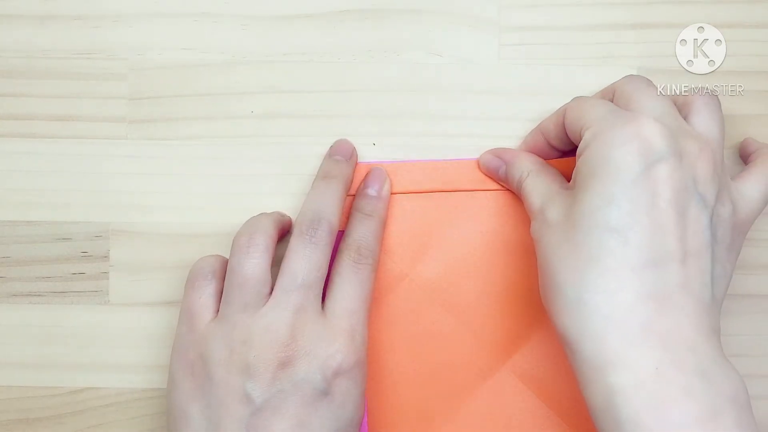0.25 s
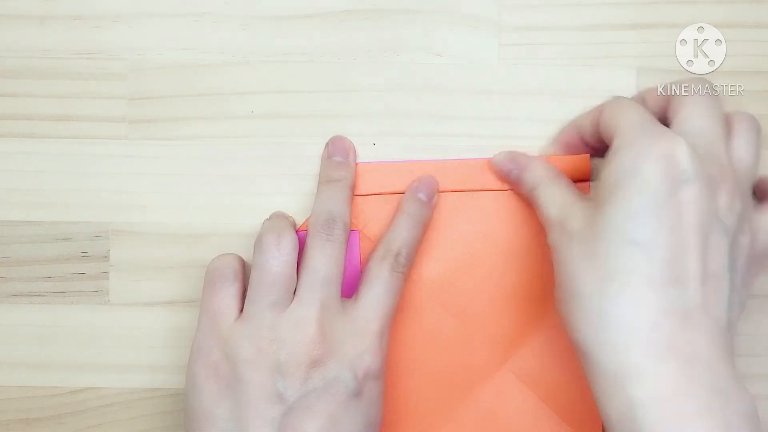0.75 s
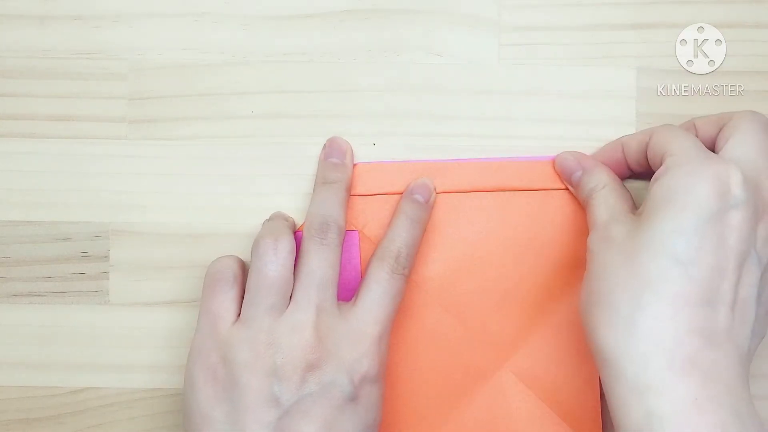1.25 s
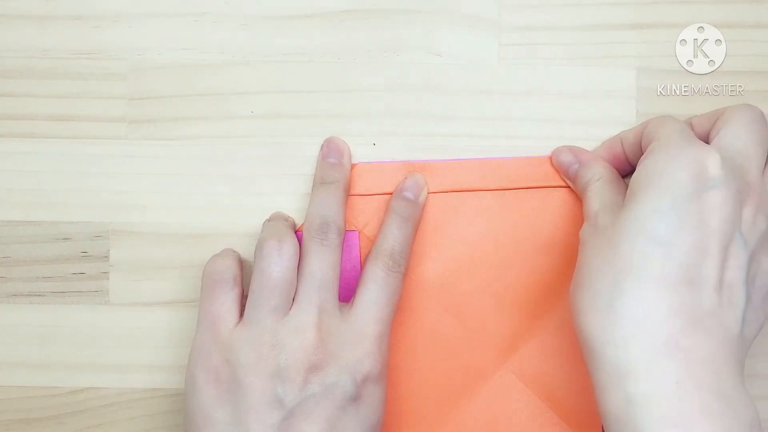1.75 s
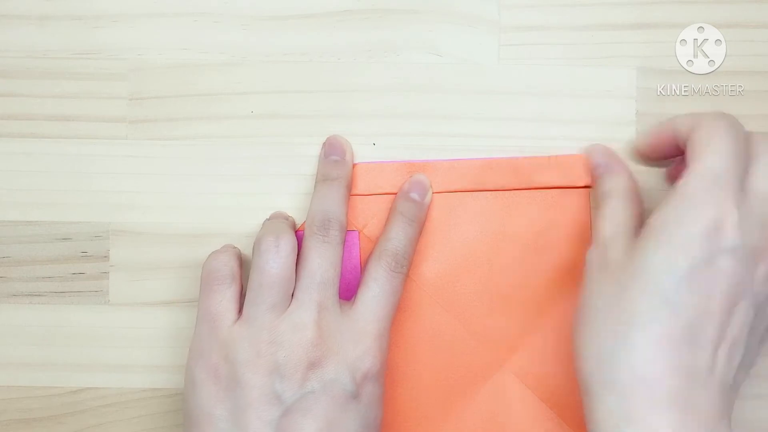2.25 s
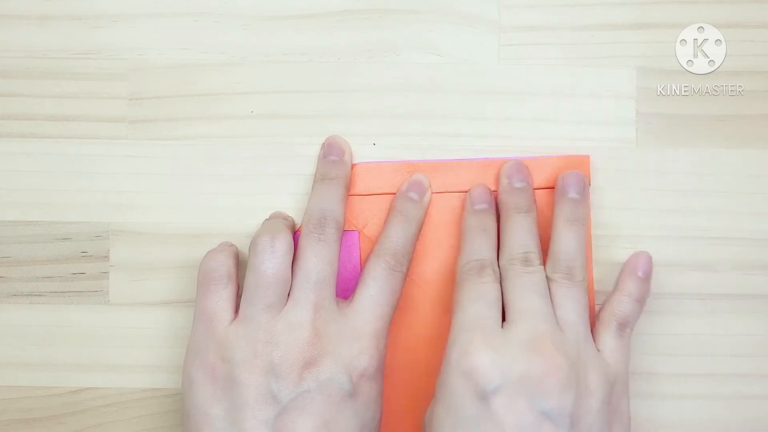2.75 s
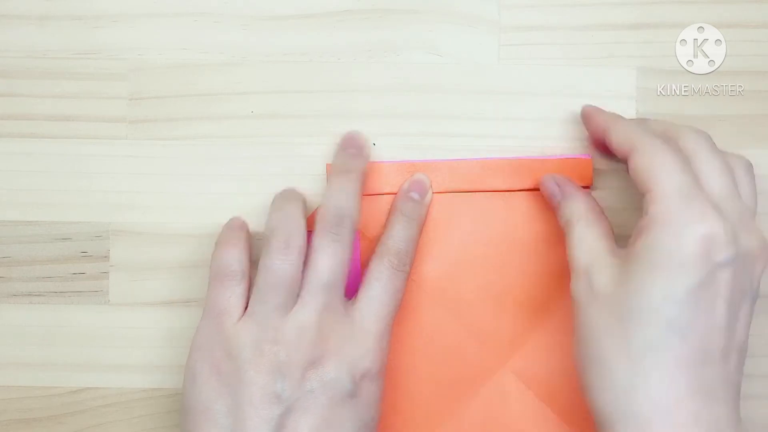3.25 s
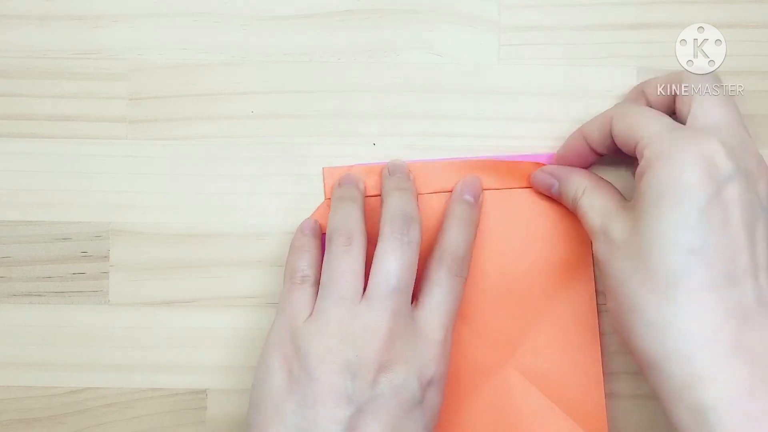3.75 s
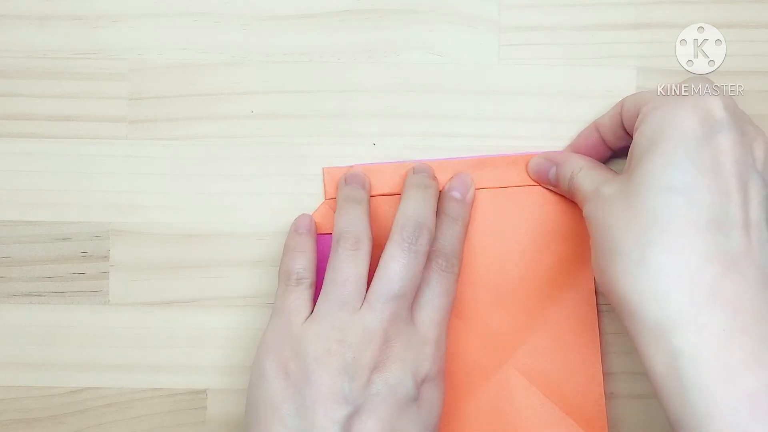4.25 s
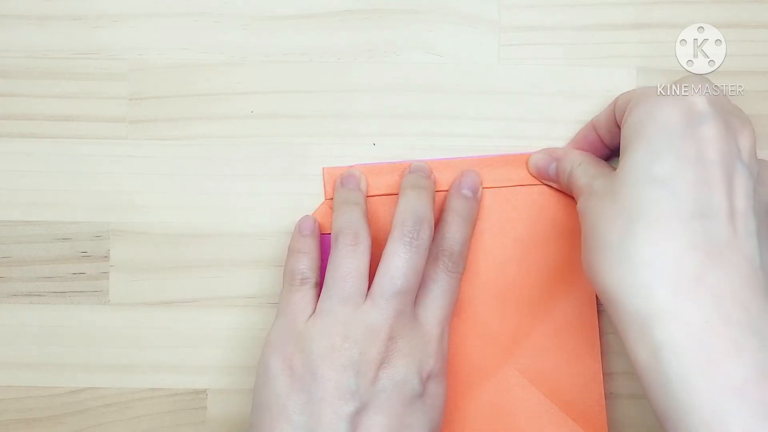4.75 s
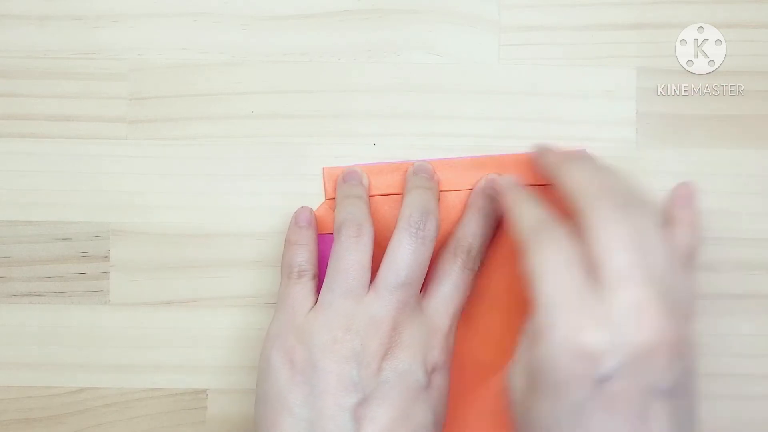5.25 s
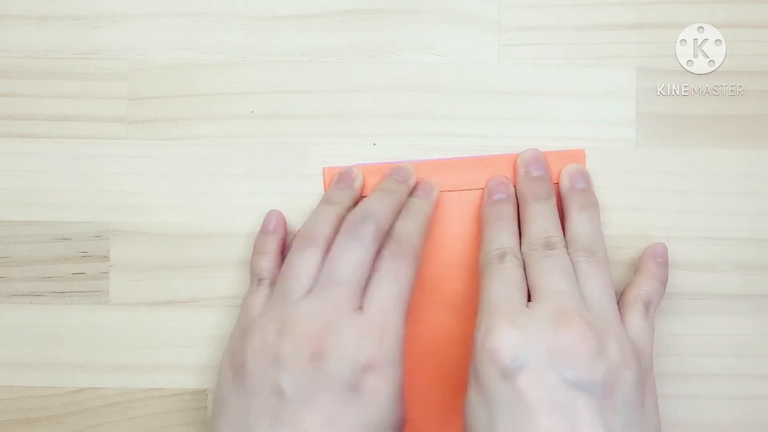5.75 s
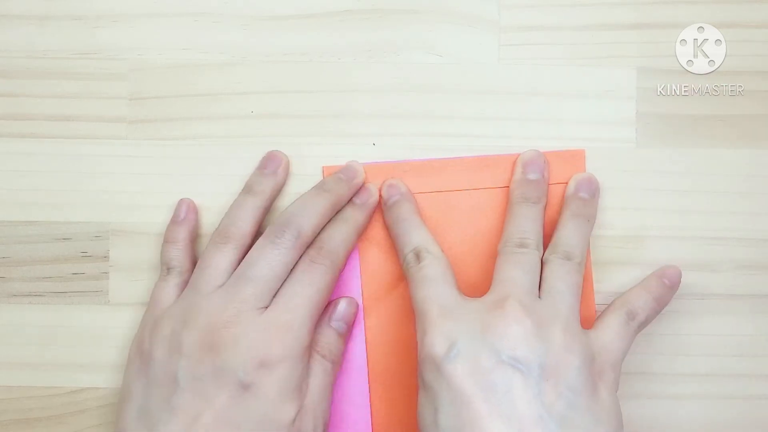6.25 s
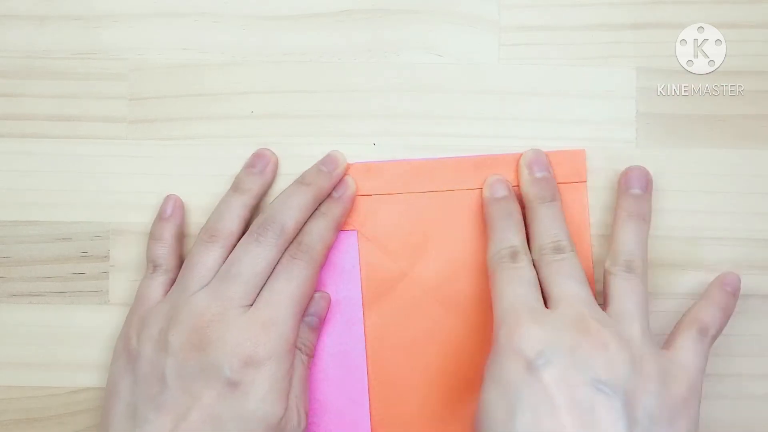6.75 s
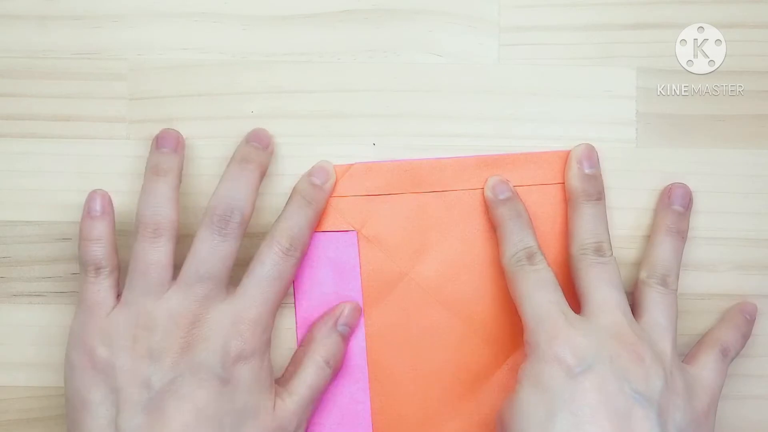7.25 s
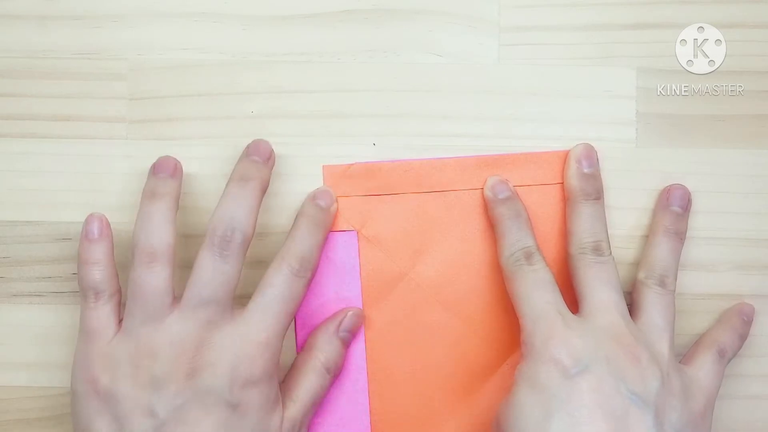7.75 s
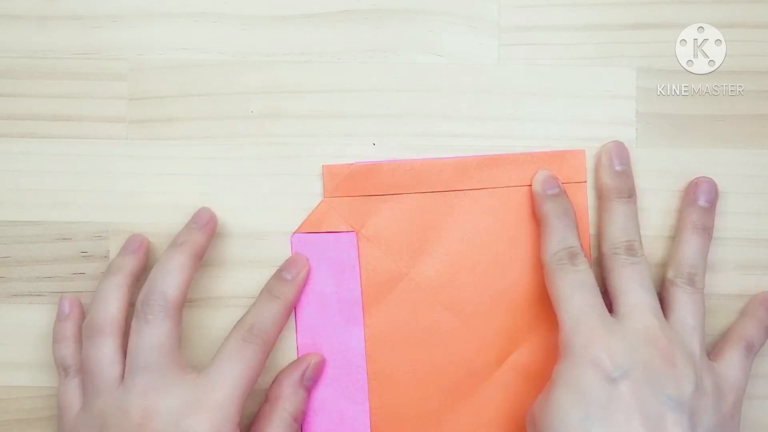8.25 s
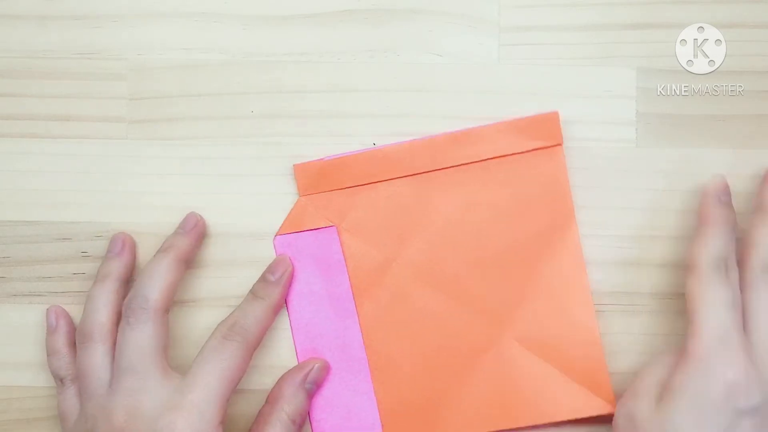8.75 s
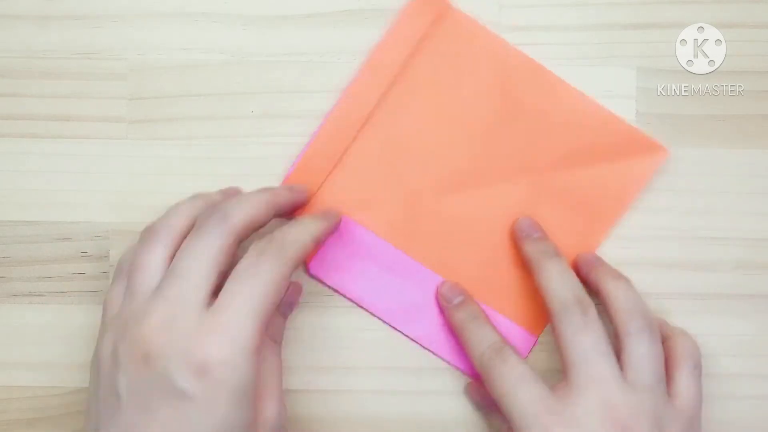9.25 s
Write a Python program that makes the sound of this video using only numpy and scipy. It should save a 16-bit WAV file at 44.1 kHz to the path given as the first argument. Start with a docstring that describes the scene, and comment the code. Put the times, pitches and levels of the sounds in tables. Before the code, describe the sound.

Close to the microphone, in a small room with a faint low hum, paper slides and crackles lightly as its edge is curled and pinched. About halfway, the heel of a hand thuds softly onto the wooden table. Light fingertip taps and hissing rubs follow as the crease is pressed flat, and the sheet is then turned on the table with a swish.

```python
"""Two hands fold paper on a wooden table, close by, in a small, quiet room with a low hum.
For the first 4 s a narrow flap is curled and pinched: it hisses as it slides and snaps where it buckles.
Near 5 s a thumb skims the crease and the heel of a hand lands. Fingers then tap and rub the crease flat;
the table top booms softly under the leaning hands. From 8.5 s the sheet swishes round on the wood."""
import sys
import numpy as np
from scipy import signal
from scipy.fft import rfft, irfft, next_fast_len
from scipy.io import wavfile
from scipy.ndimage import uniform_filter1d

SR = 44100
rng = np.random.default_rng(int(sys.argv[2]) if len(sys.argv) > 2 else 0)


def transcribe(u):
    """Save the signal u as a 16-bit wav file named by the first command-line argument.

    u: samples, shape (n,) or (channels, n), limited to [-1, 1]; the rate is SR.
    q: integer samples, one column per channel.
    """
    v = np.clip(np.atleast_2d(u).T, -1, 1)
    q = np.round(v * 32767).astype(np.int16)
    wavfile.write(sys.argv[1], SR, q)


N = 418950
TIME = np.arange(N) / SR
AGE = TIME[:SR // 3]   # seconds since a contact


def from_db(db):
    return 10 ** (np.asarray(db) / 20)


def unit_rms(x):
    return x / np.sqrt(np.mean(x ** 2) + 1e-20)


def unit_onset(x, seconds):
    """Scale to rms 1 over the first seconds."""
    return x / np.sqrt(np.mean(x[:int(seconds * SR)] ** 2) + 1e-20)


def add(out, start_s, sound):
    start = max(0, round(start_s * SR))
    out[start:start + len(sound)] += sound[:N - start]


def delayed(x, seconds):
    return np.interp(TIME - seconds, TIME, x)


def butter(x, hz, kind, order=2):
    return signal.sosfilt(signal.butter(order, hz, kind, fs=SR, output="sos"), x)


def resonance(x, hz, width_hz):
    """Band-pass with peak gain 1."""
    r = np.exp(-np.pi * width_hz / SR)
    feedback = [1, -2 * r * np.cos(2 * np.pi * hz / SR), r * r]
    return signal.lfilter(np.array([1, 0, -1]) * (1 - r * r) / 2, feedback, x)


def coloured(x, points):
    """Minimum-phase filter through (Hz, dB) points."""
    size = 2 * next_fast_len(len(x))
    hz, db = np.transpose(points)
    bin_hz = np.arange(size // 2 + 1) * SR / size + 1
    cepstrum = irfft(np.log(from_db(np.interp(np.log(bin_hz), np.log(hz), db))))
    cepstrum[1:size // 2] *= 2
    cepstrum[size // 2 + 1:] = 0
    return irfft(rfft(x, size) * np.exp(rfft(cepstrum)))[:len(x)]


def whitened(x):
    """Flatten a burst's spectrum so that it has no pitch."""
    power = uniform_filter1d(np.abs(rfft(x)) ** 2, size=260)
    hz = np.arange(len(power)) * SR / len(x) + 1
    return coloured(x, np.column_stack([hz, -10 * np.log10(power)]))


def drift(per_s):
    """Slow random curve, rms 1."""
    knots = rng.standard_normal(N // 100)
    return unit_rms(np.interp(TIME * per_s, np.arange(len(knots)), knots))


def friction(per_s, spread_db, hiss):
    """Fibres catch and let go: uneven clicks over a smooth hiss, rms 1."""
    sizes = from_db(spread_db * np.minimum(rng.exponential(1, N), 5)) * rng.choice([-1, 1], N)
    clicks = unit_rms(sizes * (rng.random(N) < per_s / SR))
    return unit_rms(clicks + hiss * rng.standard_normal(N))


def envelope(strokes, attack_s=0.002, release_s=0.019):
    """Each stroke takes hold, changes by swell_db over its length (db at midway) and lets go."""
    power = np.zeros(N)
    for start_s, length_s, db, swell_db in strokes:
        t = np.arange(int((length_s + 10 * release_s) * SR)) / SR
        attack = 1 - np.exp(-t / attack_s)
        hold = from_db(db + swell_db * (np.minimum(t / length_s, 1) - 0.5))
        release = np.exp(-np.maximum(t - length_s, 0) / release_s)
        add(power, start_s, (attack * hold * release) ** 2)
    return np.sqrt(power)


# Room noise spectrum. Each row: frequency in Hz, gain in dB.
AIR_SPECTRUM = [(22,-12),(40,7.5),(80,-9.5),(130,-11),(175,-14.5),(250,-18.5),(340,-25.5),(450,-26.5),(780,-27),(930,-24),(2000,-31.5),(7000,-40.5),(12500,-45),(15500,-59)]


def room_air(air_db=-51.5, hum_hz=61.2, hum_db=-56):
    """Faint steady noise and a wavering low hum."""
    air = unit_rms(coloured(rng.standard_normal(N), AIR_SPECTRUM))
    hum = unit_rms(resonance(rng.standard_normal(N), hum_hz, width_hz=7))
    return from_db(air_db) * air + from_db(hum_db) * butter(hum, 95, "low")


def room_reflections(x, gain_db=-11.5, first_echo_s=0.0034, t60_s=0.21, treble_t60_s=0.083):
    """Dense, dull echoes from near walls; their treble dies first."""
    echoes = rng.standard_normal(len(AGE)) * (AGE > first_echo_s)
    low = butter(echoes, 4000, "low", order=1)
    tail = low * from_db(-60 * AGE / t60_s) + (echoes - low) * from_db(-60 * AGE / treble_t60_s)
    tail = butter(tail / np.linalg.norm(tail), [200, 7500], "band", order=1)
    return from_db(gain_db) * signal.fftconvolve(x, tail)[:N]


# Shifts of weight. Each row: start in seconds, length in seconds, level in dB, swell in dB.
LEANS = [(.625, 0.024, -43, 11), (1.865, 0.024, -32, -13), (2.01, 0.12, -48, -8), (2.33, 0.071, -38, -26),
         (3.18, 0.43, -34, 4), (3.55, 0.49, -37, -13.5), (5.11, 0.19, -37, -5), (5.33, 0.15, -30.5, -16),
         (5.47, 0.37, -45, -19), (6.13, 0.25, -44.5, -14), (8.882, 0.032, -31.5, 0)]
# Table boom spectrum. Each row: frequency in Hz, gain in dB.
BOOM_SPECTRUM = [(22, -8), (45, -1), (63, 7.5), (83, 8.5), (110, -5), (160, -7), (188, -12.5), (235, -26),
                 (400, -29), (900, -65)]


def leaning_hands():
    """Trembling pressure sets the lowest modes of the table booming."""
    boom = butter(coloured(rng.standard_normal(N), BOOM_SPECTRUM), 24, "high")
    return envelope(LEANS, attack_s=0.033, release_s=0.0095) * unit_rms(boom)


# Table top modes. Each row: frequency in Hz, relative level in dB, T60 in seconds.
TABLE_MODES = [(59.5, 1, 0.24), (86.4, -6, 0.2), (108, -7, 0.5), (126.4, -11, 0.36), (181, -2, 0.082),
               (330, -10, 0.22), (376.5, -8.5, 0.094), (426, 1.5, 0.067), (493, -9, 0.018), (633, 0, 0.062),
               (1117, -6, 0.054), (1314, -9, 0.052), (1462, 1, 0.055), (1540, 2, 0.06), (1651, 2, 0.028),
               (1990, -1.5, 0.033), (2310, 0, 0.016), (2770, -4.5, 0.028), (3030, 0.5, 0.014)]
# Spectrum of the wood's dense modes. Each row: frequency in Hz, gain in dB.
WOOD_SPECTRUM = [(35, -51), (70, 8), (190, 9), (260, 4.5), (380, 4), (600, 3.5), (950, -3.5), (1700, -6.5),
                 (3200, -11), (4200, -18.5), (9000, -28), (16000, -31)]


def table_response(wash_db, vary_db=1, wash_t60_s=0.025, detune=0.016):
    """One touch rings the table's modes, as strongly as the spot allows, over a wash of dense ones."""
    hz, db, t60_s = np.transpose(TABLE_MODES)[:, :, None]
    hz = hz * (1 + detune * rng.standard_normal(hz.shape))   # the hands' load shifts the modes
    signs = (-1) ** np.arange(len(hz))[:, None]
    strength = signs * from_db(db + vary_db * rng.standard_normal(hz.shape))
    modes = np.sum(strength * np.sin(2 * np.pi * hz * AGE) * from_db(-60 * AGE / t60_s), axis=0)
    wash = unit_rms(coloured(rng.standard_normal(len(AGE)), WOOD_SPECTRUM))
    return modes + wash * from_db(wash_db - 60 * AGE / wash_t60_s)


def fidgeting(level_db=-74):
    """The pads of resting fingers pat the wood very lightly."""
    touches = friction(per_s=24, spread_db=1, hiss=0)
    wood = signal.fftconvolve(touches, table_response(wash_db=2))[:N]
    return from_db(level_db) * unit_rms(butter(wood, [200, 450], "band"))


# The heel of a hand rolls down. Each row: start in seconds, length in seconds, level in dB, swell in dB.
PALM_PRESSES = [(5.247, 0.049, -35, 1), (5.31, 0.122, -49.5, -5)]
# Table resonances under a whole hand. Each row: frequency in Hz, width in Hz, gain in dB.
PALM_RESONANCES = [(195, 24, 19), (345, 60, 10)]


def landing_palm(band_hz=(170, 520)):
    """Soft flesh spreads over the wood: a dull rumble that keeps the low modes ringing."""
    push = friction(per_s=390, spread_db=2, hiss=0.36)
    push = butter(butter(push, band_hz[0], "high"), band_hz[1], "low", order=3)
    rings = sum(from_db(db) * resonance(push, hz, width_hz) for hz, width_hz, db in PALM_RESONANCES)
    return envelope(PALM_PRESSES) * unit_rms(push + rings)


# Finger landings. Each row: start in seconds, thud in dB, knock in dB, knock cutoff in Hz, click in dB.
FINGER_TAPS = [(.006, -62, -56.5, 1110, -66), (.532, -60, -54.5, 910, -67), (.574, -56, -55, 760, -65),
               (1.541, -52.5, -60, 650, -82), (1.67, -49, -59.5, 650, -75), (1.799, -56, -63, 650, -74),
               (1.854, -45, -63, 600, -69), (2.003, -48, -56.5, 590, -54.5), (2.038, -57, -49.5, 417, -62),
               (2.245, -61, -63, 700, -78), (2.601, -51, -54.5, 400, -62), (3.842, -67, -55, 505, -54.5),
               (4.306, -51.5, -58, 550, -64), (4.342, -54, -58.5, 700, -73),
               (4.738, -47, -56.5, 510, -62.5), (4.851, -34, -41, 760, -56), (4.938, -48, -55, 550, -62),
               (5.25, -28.5, -44, 394, -59.5), (5.277, -33.5, -56, 654, -60), (5.327, -33, -54, 400, -77),
               (5.346, -35.5, -54, 350, -81), (5.412, -45, -54, 700, -60), (5.494, -48, -51.5, 700, -56.5),
               (5.526, -58, -55, 600, -55), (5.585, -45, -54, 450, -70), (5.832, -42, -39, 720, -46),
               (6.118, -45, -55, 650, -59), (6.140, -37.5, -45, 520, -43.5), (6.217, -55, -51, 700, -63),
               (6.239, -42, -42.5, 680, -45), (6.381, -49, -50, 753, -56), (6.442, -54, -59, 696, -56.5),
               (6.543, -70, -61, 720, -49.5), (6.563, -48.5, -50.5, 750, -51),
               (6.648, -44.5, -52.5, 750, -71), (6.7, -47, -51, 600, -72), (6.760, -43.5, -48, 694, -49.5),
               (6.788, -60, -63, 700, -47), (6.993, -61, -52.5, 377, -67.5), (7.709, -47, -51, 700, -45.5),
               (7.9, -55, -55, 412, -86), (8.161, -50, -52.5, 796, -45), (8.89, -58, -50.5, 850, -47),
               (9.119, -68, -72, 700, -53), (9.225, -39.5, -40, 795, -55)]


def tapping_fingers(settle_s=0.013, settle_db=-24, pad_damping_s=0.036, thud_lag_s=0.00698):
    """A finger lands and settles: its weight thuds, its pad knocks and damps the wood, its nail clicks."""
    out = np.zeros(N)
    for start_s, thud_db, knock_db, knock_cutoff_hz, click_db in FINGER_TAPS:
        force = from_db(settle_db) * rng.standard_normal(len(AGE)) * np.exp(-AGE / settle_s)
        force[0] += 1
        wood = signal.fftconvolve(force, table_response(wash_db=8, vary_db=2))[:len(AGE)]
        thud = butter(wood, [30, 160], "band", order=3)
        knock = butter(wood * np.exp(-AGE / pad_damping_s), 228, "high", order=3)
        knock = butter(knock, knock_cutoff_hz, "low", order=4)
        click = butter(wood, 950, "high", order=3)
        add(out, start_s + thud_lag_s, from_db(thud_db) * unit_onset(thud, 0.05))
        add(out, start_s, from_db(knock_db) * unit_onset(knock, 0.03))
        add(out, start_s, from_db(click_db) * unit_onset(click, 0.03))
    return out


# Sheet resonances. Each row: frequency in Hz, width in Hz, gain in dB.
SHEET_RESONANCES = [(2380,110,-4.5),(3120,68,-21),(4430,53,-4),(6540,73,-9),(9140,300,-2.5)]
# Bending waves returning from the edge and the fingers. Each row: delay in seconds, gain in dB.
WAVE_RETURNS = [(0.00055, -21), (0.00128, -10), (0.0021, -9.5)]


def paper_hiss(spectrum, spread_db, uneven_db, wander=0.072):
    """Friction rings the sheet; returning waves shift its colour as the hands move. Rms 1."""
    grains = friction(per_s=6000, spread_db=spread_db, hiss=0.78) * from_db(uneven_db * drift(per_s=70))
    rings = sum(from_db(db) * resonance(grains, hz, width_hz) for hz, width_hz, db in SHEET_RESONANCES)
    sheet = grains + rings
    returns = sum(from_db(db) * delayed(sheet, delay_s * (1 + wander * drift(per_s=7)))
                  for delay_s, db in WAVE_RETURNS)
    return unit_rms(coloured(sheet + returns, spectrum))


# Drags over sheet and table. Each row: start in seconds, length in seconds, hiss in dB,
# relative wood level in dB, swell in dB.
FINGER_DRAGS = [(0.111, 0.19, -99, -69.5, -4), (0.554, 0.18, -78, -65, 2), (3.14, 0.42, -69.5, -60, 5),
                (3.562, 0.47, -66, -68, -4), (5.399, 0.16, -61.5, -63, 3.5), (5.585, 0.23, -56.5, -59, 6),
                (5.831, 0.089, -61, -54.5, -9), (6.108, 0.18, -67.5, -57.5, 3), (6.37, 0.23, -61, -60, 0.5),
                (6.628, 0.089, -62, -56.5, -1.5), (6.735, 0.055, -58, -54.5, 12.5),
                (6.83, 0.2, -72.5, -66, -1), (7.067, 0.069, -63.5, -67.5, -12),
                (7.335, 0.076, -60, -66, -1.5), (7.721, 0.043, -56.5, -79, 8), (7.83, 0.31, -64.5, -67, -3),
                (8.171, 0.19, -57, -62.5, -3.5), (9.177, 0.21, -82, -59.5, -12),
                (9.372, 0.1, -79, -56.5, 13.5)]
# Spectrum of skin on paper. Each row: frequency in Hz, gain in dB.
RUB_SPECTRUM = [(300,-41),(1000,1.5),(2600,0.5),(4500,0.5),(6000,3),(8800,-0.5),(10300,-2.5),(13000,-0.5),(15800,-18)]


def rubbing_fingers(wood_gain_db=3.5, rasp_hz=3000, rasp_db=-9):
    """Skin sticks and slips: the paper hisses and rasps, the wood answers differently at every spot."""
    start_s, length_s, hiss_db, wood_db, swell_db = np.transpose(FINGER_DRAGS)
    hiss = paper_hiss(RUB_SPECTRUM, spread_db=3, uneven_db=2)
    rasp = from_db(rasp_db) * resonance(hiss, rasp_hz, width_hz=1100)
    out = unit_rms(hiss + rasp) * envelope(zip(start_s, length_s, hiss_db, swell_db))
    grains = friction(per_s=900, spread_db=4, hiss=1)
    for drag in zip(start_s, length_s, wood_db + wood_gain_db, swell_db):
        spot = butter(table_response(wash_db=14, vary_db=2.5), 152, "high")
        out += signal.oaconvolve(grains * envelope([drag]), spot / np.linalg.norm(spot))[:N]
    return out


# An edge or fingertip catches. Each row: start in seconds, length in seconds, level in dB, swell in dB,
# first and last pitch in Hz.
SCRATCH_GLIDES = [(6.428, .16, -64.5, 9, 2830, 3350), (8.652, 0.08, -56.5, 4, 6000, 6650),
                  (8.769, 0.1, -63, 21, 3000, 3225), (8.819, 0.044, -55, 2, 5800, 6160),
                  (9.14, 0.19, -62, 2, 8300, 8840)]


def scratches(half_width_hz=750):
    """Every slip is a tiny ring whose pitch follows the moving contact."""
    out = np.zeros(N)
    slips = unit_rms(butter(friction(per_s=650, spread_db=2, hiss=1), half_width_hz, "low"))
    for start_s, length_s, db, swell_db, first_hz, last_hz in SCRATCH_GLIDES:
        hz = np.interp(TIME, [start_s, start_s + length_s], [first_hz, last_hz])
        ring = np.sqrt(2) * np.sin(2 * np.pi * np.cumsum(hz) / SR)
        out += envelope([(start_s, length_s, db, swell_db)]) * slips * ring
    return out


# Thumb strokes. Each row: start in seconds, length in seconds, level in dB, swell in dB.
THUMB_STROKES = [(4.655, 0.035, -58.5, 3), (4.852, 0.039, -54.5, -9), (4.94, 0.05, -56, 9),
                 (5.27, 0.031, -56, 6)]
# Spectrum of the thumb's hiss. Each row: frequency in Hz, gain in dB.
THUMB_SPECTRUM = [(300,-14),(2000,-8),(5000,1.5),(8800,5),(14000,0),(15800,-9)]


def skimming_thumb():
    """A thumb skims the crease with a bright hiss."""
    return envelope(THUMB_STROKES) * paper_hiss(THUMB_SPECTRUM, spread_db=3.5, uneven_db=1.6)


# Swish of the turn. Each row: time in seconds, relative level in dB.
TURN_LEVELS = [(8.5, -98), (8.555, -80), (8.572, -62.5), (8.64, -64), (8.66, -54.5), (8.745, -49.5),
               (8.762, -55), (8.775, -50.5), (8.94, -52), (8.98, -58), (9.015, -50.5), (9.05, -58),
               (9.114, -50), (9.22, -51), (9.31, -54), (9.38, -64.5), (9.5, -59)]
# Spectrum of paper on wood. Each row: frequency in Hz, gain in dB.
TURN_SPECTRUM = [(200,-14),(450,-3),(700,2),(1100,-1.5),(2300,-0.5),(3100,2.5),(4500,1.5),(6200,1.5),(8800,-0.5),(10500,-3.5),(13300,-3.5),(15800,-15)]


def turning_sheet(gain_db=2.5, reflection_db=-12, comb_hz=(6300, 9000)):
    """The sheet swishes round; its reflection off the table rises in pitch as the path shortens."""
    level_db = gain_db + np.interp(TIME, *np.transpose(TURN_LEVELS))
    swish = from_db(level_db) * paper_hiss(TURN_SPECTRUM, spread_db=0.5, uneven_db=0.8)
    lag_s = 1 / np.interp(TIME, [8.75, 9.1], comb_hz)
    return swish + from_db(reflection_db) * delayed(swish, lag_s)


# Flap scrapes. Each row: start in seconds, length in seconds, hiss in dB, swell in dB.
FLAP_STROKES = [(.50, 0.085, -58.5, 3), (.608, 0.15, -54.5, -2), (2.085, 0.049, -55, -10),
                (2.35, 0.15, -56.5, -0.5), (2.715, 0.017, -65.5, -3), (2.76, 0.03, -64.5, -6),
                (2.845, 0.017, -59.5, 4), (2.885, 0.11, -61.5, 4), (3.17, 0.023, -61, -2),
                (3.23, 0.089, -62, 12), (3.475, 0.069, -54, 15), (3.61, 0.18, -64.5, -4),
                (3.94, 0.071, -66.5, 8)]
# Spectrum of the flap's hiss. Each row: frequency in Hz, gain in dB.
FLAP_SPECTRUM = [(300,3.5),(700,-3),(1200,-3.5),(2400,0.5),(3200,2),(4600,-1),(5600,-7),(7400,3),(8800,3.5),(10300,-2.5),(12800,2),(15800,-14)]
# The fold rings less as it is flattened. Each row: time in seconds, relative gain in dB.
FOLD_RING = [(.8, 8.5), (3.05, 4.5), (3.3, 2.5)]


def scraping_flap(fold_hz=5670, fold_width_hz=294, fold_gain_db=14):
    """The flap scrapes over the sheet; the air in the narrow fold rings along and almost whistles."""
    scrape = envelope(FLAP_STROKES) * paper_hiss(FLAP_SPECTRUM, spread_db=2.5, uneven_db=0.1)
    ring_db = fold_gain_db + np.interp(TIME, *np.transpose(FOLD_RING))
    return scrape + from_db(ring_db) * resonance(scrape, fold_hz, fold_width_hz)


# Buckles. Each row: start in seconds, level in dB, ring in Hz, top edge in Hz, flutter decay in seconds.
BUCKLES = [(.477, -48.5, 1680, 3500, 0.0064), (0.564, -49, 2350, 3400, 0.017),
           (0.751, -48, 1740, 8200, 0.018), (.803, -25.5, 6860, 8800, 0.0027),
           (1.266, -60.5, 2240, 6300, 0.005), (1.311, -56, 1450, 10700, 0.0072),
           (2.005, -47.5, 5460, 8400, 0.0029), (2.085, -43, 1970, 8600, 0.0046),
           (2.14, -38.5, 2270, 9050, 0.0054), (2.339, -49.5, 1400, 7600, 0.0048),
           (2.405, -40, 4870, 8100, 0.0065), (2.599, -53, 6300, 10000, 0.0063),
           (2.978, -42, 5300, 9700, 0.004), (3.027, -47.5, 5140, 7660, 0.0036),
           (3.116, -57, 2090, 9600, 0.012), (3.324, -51, 3030, 9800, 0.0021),
           (3.470, -47.5, 1410, 8100, 0.0094), (3.4967, -40, 4860, 10600, 0.0049),
           (3.602, -42.5, 1420, 4720, 0.012), (3.612, -43.5, 2260, 8750, 0.015),
           (3.845, -39.5, 5800, 6000, 0.0027), (4.061, -40.5, 3080, 8950, 0.0029),
           (4.3427, -47, 1310, 5960, 0.0024), (4.887, -43, 6250, 10500, 0.0054),
           (5.005, -36.5, 8100, 8300, 0.0036), (5.186, -57.5, 8850, 11000, 0.0084),
           (5.308, -42.5, 8700, 12000, 0.0046), (6.141, -47.5, 1570, 6860, 0.005),
           (6.779, -48, 1740, 8930, 0.005), (7.819, -39, 3120, 5400, 0.0031),
           (8.022, -54.5, 2730, 7000, 0.0045), (8.879, -40, 3630, 6740, 0.014),
           (8.892, -43.5, 2960, 4700, 0.0077)]
# Snap spectrum. Each row: frequency in Hz, gain in dB.
SNAP_SPECTRUM = [(300, -101), (900, 5.5), (1400, 2), (4000, -0.5), (7500, 0), (9500, 0.5), (11500, -5),
                 (16000, -2)]


def buckling_paper(crack_s=0.000075, crack_db=2, rise_s=0.0001, crumble_s=0.016, crumble_db=-21,
                   ring_q=7, jolt_db=-15, jolt_limit_db=-60):
    """A patch flips with a crack, flutters briefly around its own pitch and jolts the table."""
    out = np.zeros(N)
    for start_s, db, ring_hz, edge_hz, flutter_s in BUCKLES:
        crack = from_db(crack_db) * np.exp(-AGE / crack_s)
        shape = (crack + np.exp(-AGE / flutter_s)) * (1 - np.exp(-AGE / rise_s))
        fibres = unit_rms(rng.standard_normal(len(AGE)) ** 7)   # fibres go on giving way
        crumble = from_db(crumble_db) * fibres * np.exp(-AGE / crumble_s)
        snap = coloured(whitened(rng.choice([-1, 1], len(AGE)) * shape + crumble), SNAP_SPECTRUM)
        octaves = np.log2(ring_hz / 2000)
        snap = butter(snap, 1200 + 260 * octaves, "high", order=4)   # smaller patch, less bass
        ring_db = 8 - 3 * octaves   # wide, low patches ring most
        snap = snap + from_db(ring_db) * resonance(snap, ring_hz, ring_hz / ring_q)
        snap = coloured(snap, [(edge_hz, 0), (edge_hz * 1.67, -15)])   # softer bend, less treble
        add(out, start_s, from_db(db) * unit_onset(snap, 0.01))
        jolt = unit_onset(butter(table_response(wash_db=14), [350, 1400], "band"), 0.023)
        add(out, start_s, from_db(min(db + jolt_db, jolt_limit_db)) * jolt)
    return out


def scene():
    """Paper and hands with their reflections, over table boom and room air; mono."""
    paper = scraping_flap() + skimming_thumb() + turning_sheet() + scratches() + buckling_paper()
    hands = rubbing_fingers() + tapping_fingers() + landing_palm() + fidgeting()
    direct = paper + hands
    return (direct + room_reflections(direct) + leaning_hands() + room_air())[None]


def record(dry):
    """Steep low-pass at 15.9 kHz."""
    return signal.sosfilt(signal.ellip(10, 0.2, 70, 15900, fs=SR, output="sos"), dry)


dry = scene()
out = record(dry)
transcribe(out)
```